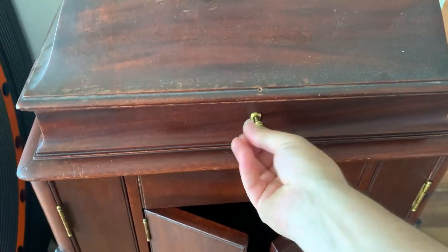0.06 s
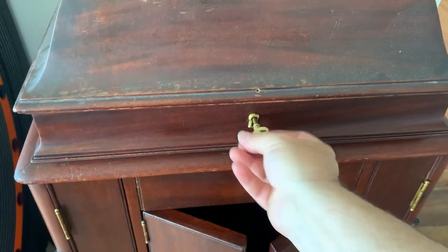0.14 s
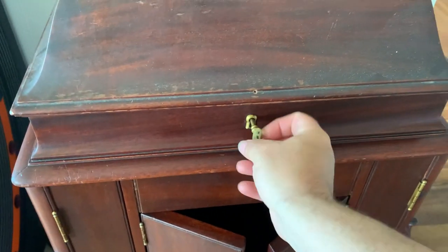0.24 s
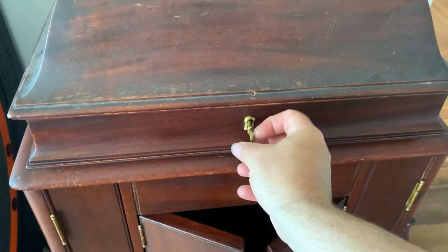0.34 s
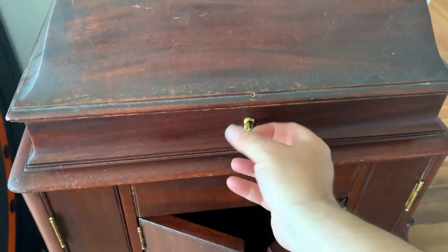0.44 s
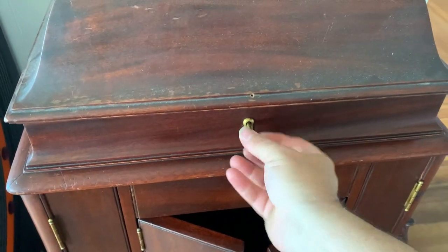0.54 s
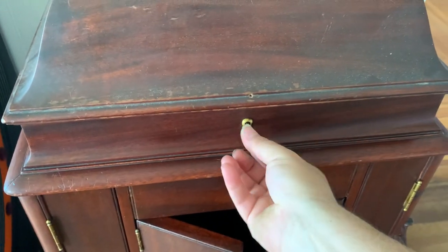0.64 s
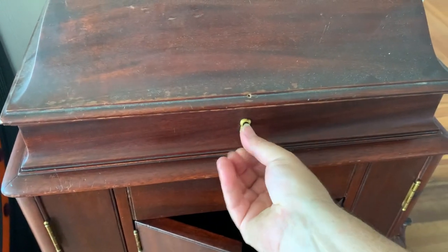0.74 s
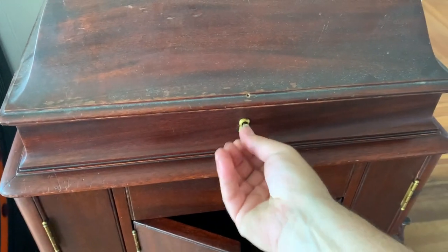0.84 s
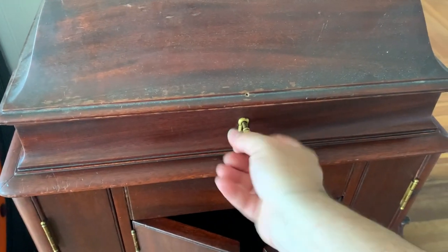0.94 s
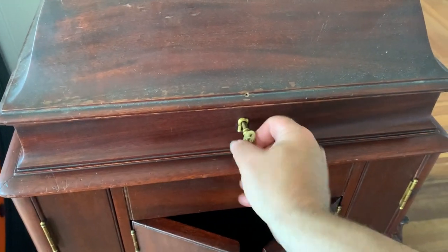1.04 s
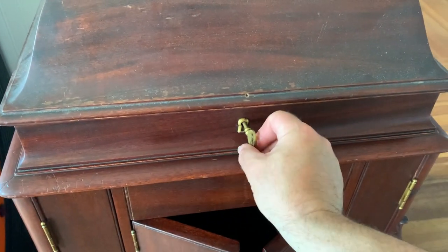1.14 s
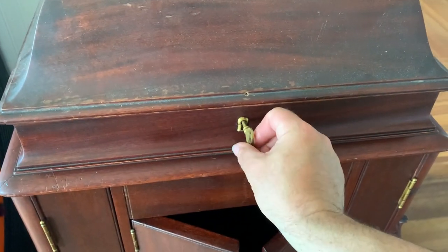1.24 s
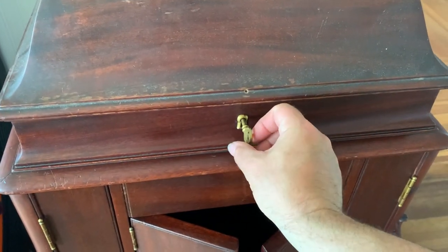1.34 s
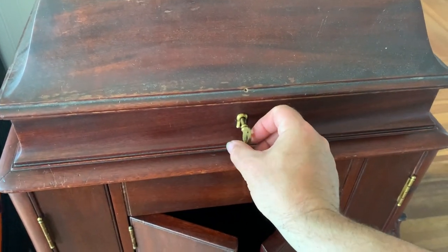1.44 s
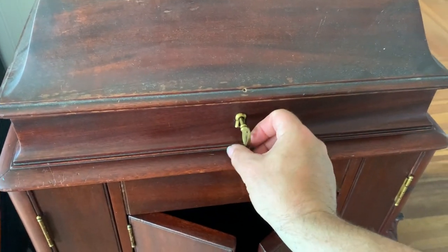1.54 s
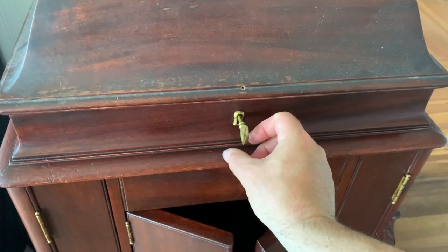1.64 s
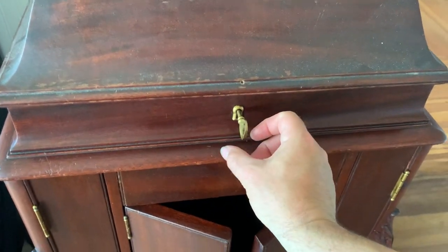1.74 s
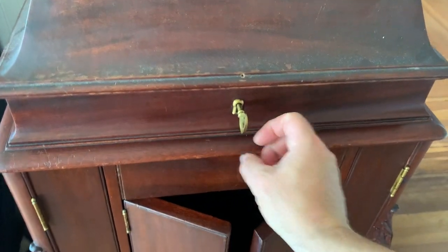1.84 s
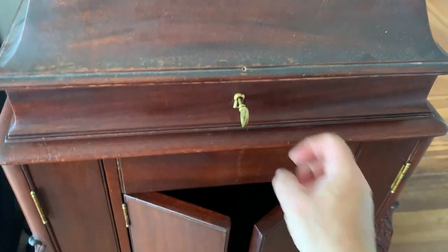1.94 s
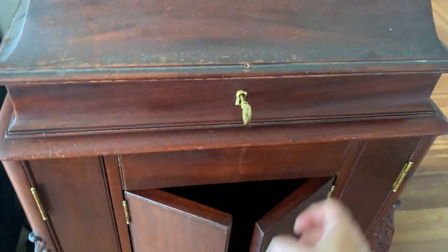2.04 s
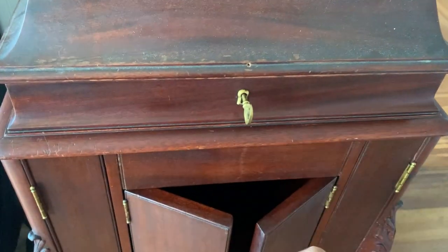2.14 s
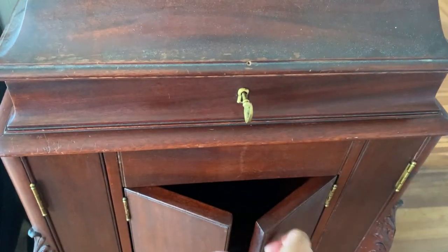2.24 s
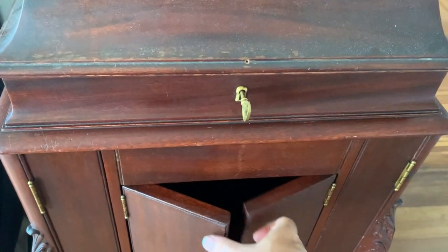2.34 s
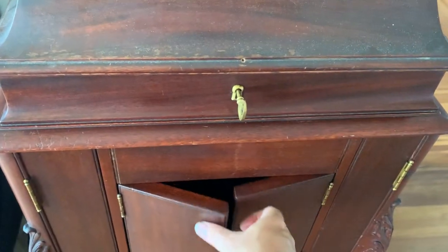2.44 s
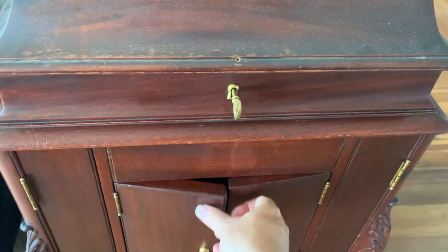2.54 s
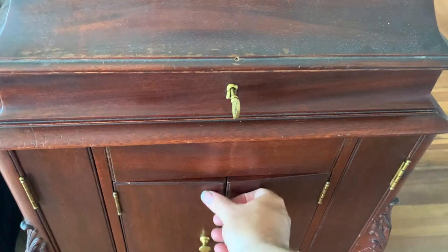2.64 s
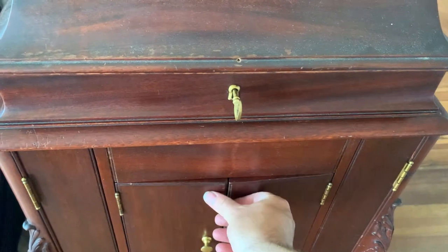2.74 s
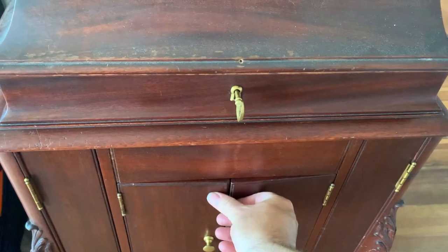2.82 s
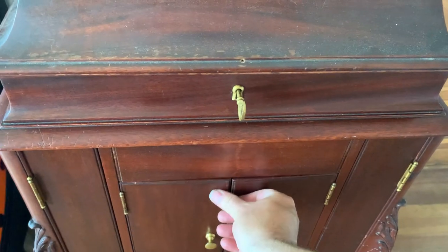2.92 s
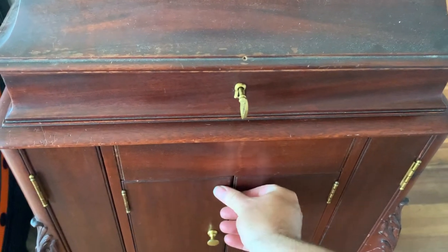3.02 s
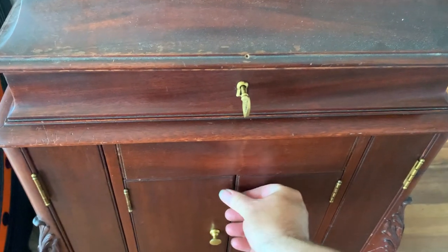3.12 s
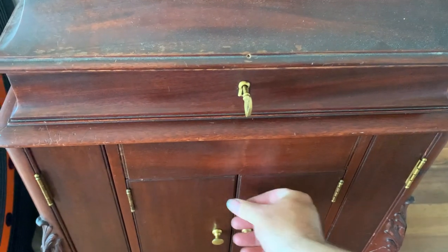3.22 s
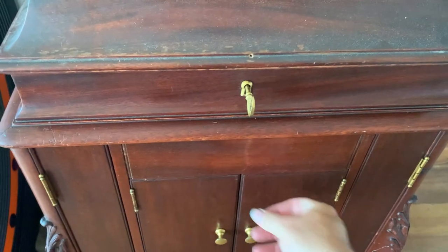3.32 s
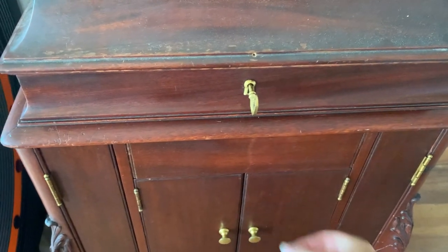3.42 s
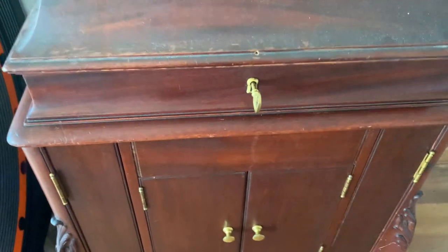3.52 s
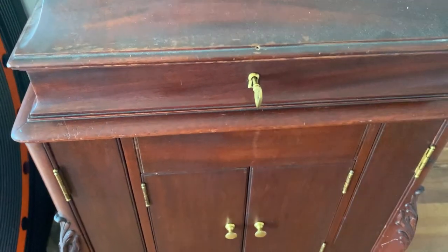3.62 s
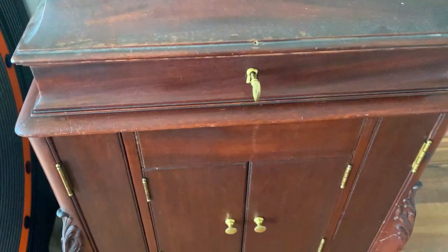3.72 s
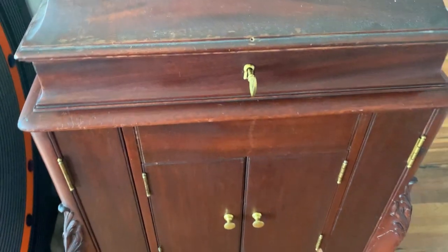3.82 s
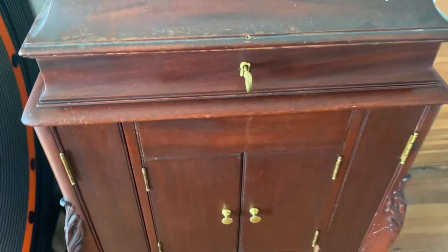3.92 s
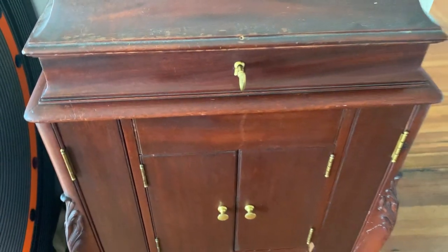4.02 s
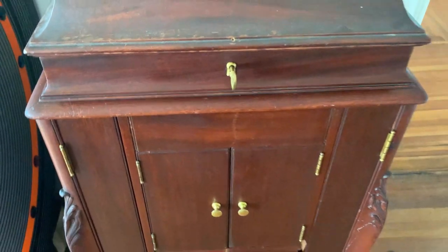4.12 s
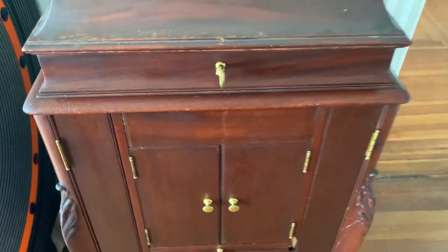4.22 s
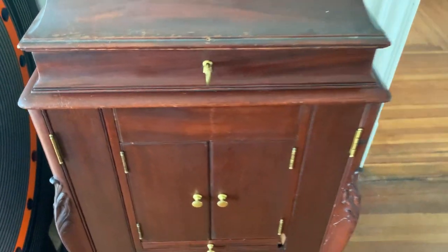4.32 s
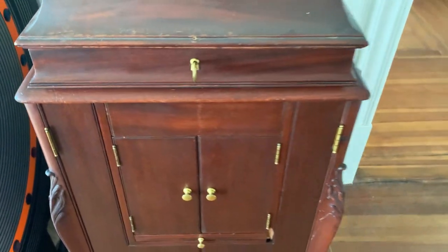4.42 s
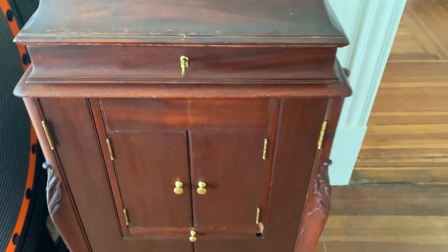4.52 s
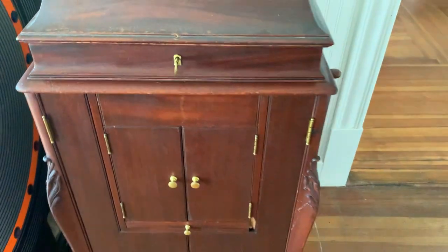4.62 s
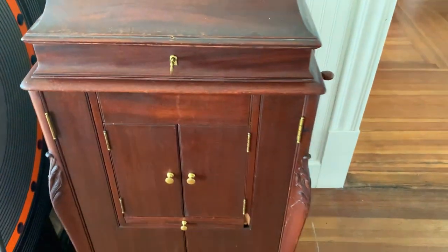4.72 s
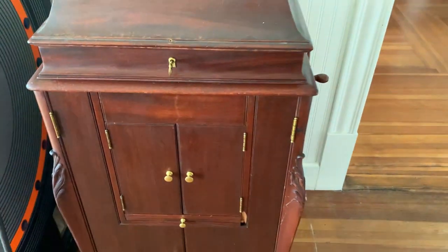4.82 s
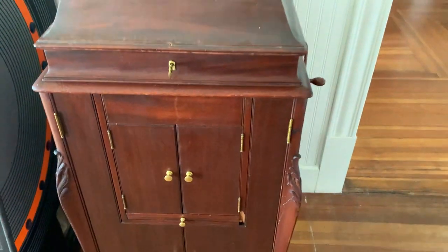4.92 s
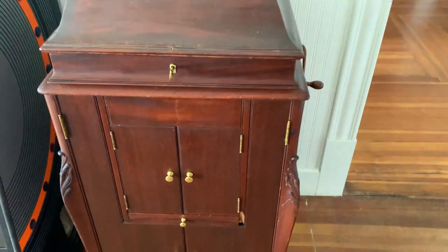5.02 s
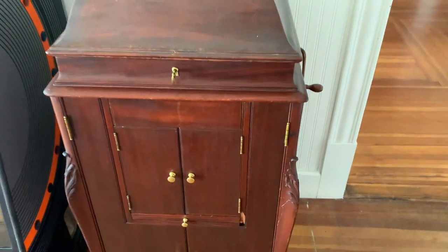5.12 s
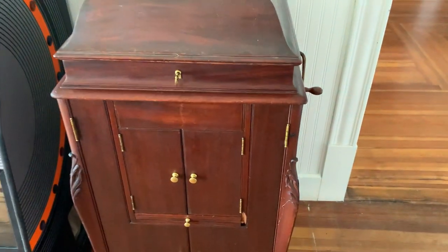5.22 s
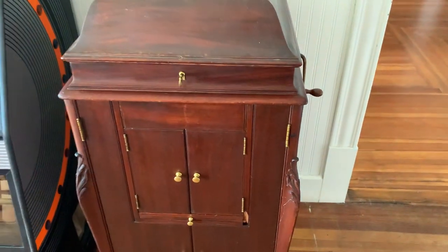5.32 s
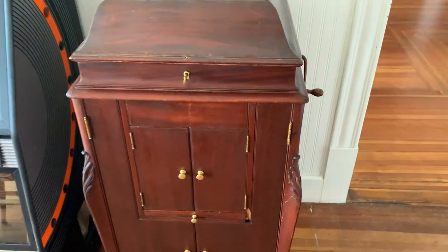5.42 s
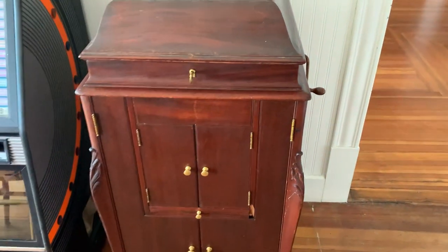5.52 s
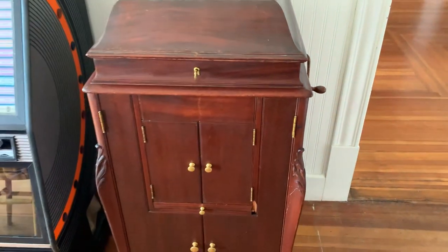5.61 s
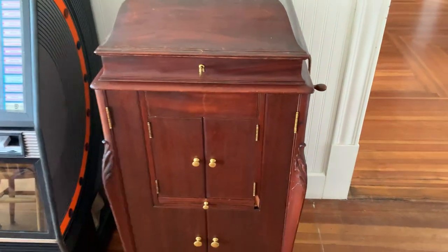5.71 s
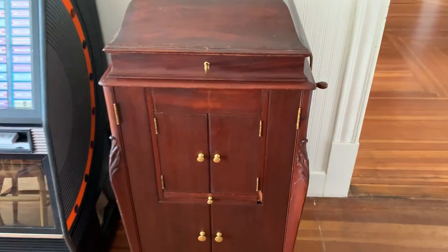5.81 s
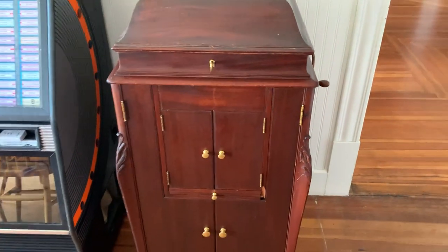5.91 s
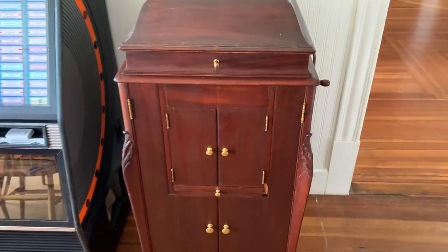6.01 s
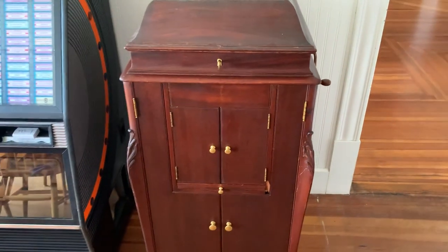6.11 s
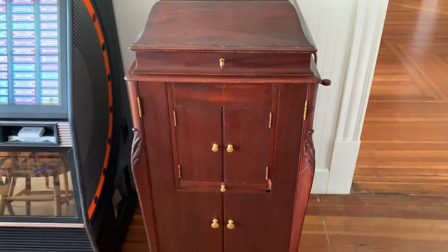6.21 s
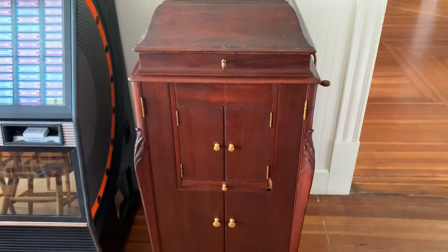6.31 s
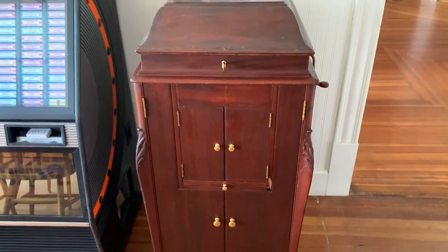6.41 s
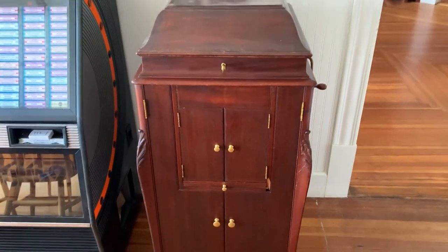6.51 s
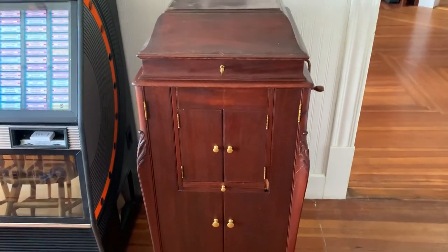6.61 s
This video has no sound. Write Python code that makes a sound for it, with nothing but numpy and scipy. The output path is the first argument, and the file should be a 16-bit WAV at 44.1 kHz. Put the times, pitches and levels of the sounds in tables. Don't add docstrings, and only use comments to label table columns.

```python
import sys
import numpy as np
from scipy import signal
from scipy.fft import rfft, irfft, next_fast_len
from scipy.io import wavfile
from scipy.ndimage import uniform_filter1d

SR = 44100
rng = np.random.default_rng(int(sys.argv[2]) if len(sys.argv) > 2 else 0)


def boost_factor(decibels):
    exponent = np.asarray(decibels, float) / 20
    return 10 ** exponent


def bounce(signal):
    frames = np.transpose(np.atleast_2d(signal))
    limited = np.clip(frames, -1, 1)
    pcm = np.round(limited * 32767).astype(np.int16)
    wavfile.write(sys.argv[1], SR, pcm)


N = 293696
T = np.arange(SR // 3) / SR

# start_s, knock_db, wood_db re knock, tick_db re knock, knock_pitch_hz
SLAM = [(3.025, -12, -4.5, -2.5, 1000), (3.024, -17, 9, -11, 1020), (3.03, -16, -7.5, -15, 4040),
        (3.0348, -16, 4, -12.5, 1100), (3.041, -11.5, -1.5, -1.5, 2616), (3.0526, -21, 7.5, -1.5, 1092)]


def along(table, hz):
    table_hz, values = np.transpose(table)
    return np.interp(np.log(np.maximum(hz, 1)), np.log(table_hz), values)


def colour(x, table, turn=1):
    size = next_fast_len(N + SR // 4)
    gain = boost_factor(along(table, np.fft.rfftfreq(size, 1 / SR)))
    return irfft(rfft(x, size) * turn * gain, size)[:N]


def band(x, lo_hz, hi_hz):
    sos = signal.butter(2, [lo_hz, min(hi_hz, SR * 0.45)], "band", fs=SR, output="sos")
    return signal.sosfilt(sos, x)


def walk(rate_hz):
    k = int(SR / rate_hz)
    levels = np.repeat(rng.standard_normal(N // 500), k)[:N]
    return 1.3 * uniform_filter1d(uniform_filter1d(levels, k), k)


def peak(x, db):
    return x * boost_factor(db) / np.sqrt(np.max(uniform_filter1d(x ** 2, size=128)))


def add(track, start_s, sound):
    i = int(start_s * SR)
    track[i:i + len(sound)] += sound[:N - i]


def ring(modes, push_s, scatter_db):
    hz, db, t60_s = np.transpose(modes)[:, :, None]
    luck, polarity = rng.standard_normal((2, len(modes), 1))
    weight = boost_factor(db + scatter_db * luck) * np.sign(polarity)
    y = np.sum(weight * np.sin(2 * np.pi * hz * T) * boost_factor(-60 * T / t60_s), axis=0)
    return y * (1 - np.exp(-T / push_s))


def burst(t60_s, lo_hz, hi_hz, rise_s=0.0004):
    envelope = boost_factor(-60 * T / t60_s) * np.minimum(T / rise_s, 1)
    return band(rng.standard_normal(len(T)) * envelope, lo_hz, hi_hz)


def spread(x, lo_hz, hi_hz):
    click = band(T < 0.5 / SR, lo_hz, hi_hz)
    return click * np.sqrt(np.sum(x ** 2) / np.sum(click ** 2))


def contacts(table, wood_hz, wood_t60, box_db, hold, push_s, thud_db, knock_t60, crack_db,
             tick_s, rise_s, panel_db, tick_hz):
    # pitch_hz, level_db, t60_s
    cabinet_modes = [(151, -6, .2), (244, -7.5, 0.23), (341.8, 0, 0.16), (453.3, -9.5, 0.39),
                     (521, -4.5, 0.19), (575, -2, 0.5), (642.4, -12, 0.077), (740, -10.5, 0.19),
                     (1013, -6.5, .12), (1150, -22.5, 0.23)]
    # pitch_hz, level_db, t60_s
    panel_modes = [(930, -10, 0.14), (1205, -12.5, .02), (1750, -10.5, 0.0086), (2500, 2.5, 0.022)]
    near, far = np.zeros((2, N))
    body = [(hz, db + box_db, hold * min(t60, 0.4)) for hz, db, t60 in cabinet_modes]
    panel = [(hz, db + panel_db, t60) for hz, db, t60 in panel_modes]
    wood_modes = [(wood_hz, 0, wood_t60), (1.1 * wood_hz, -7, 0.54 * wood_t60)] + body
    for start_s, db, wood_db, tick_db, knock_hz in table:
        wood = peak(ring(wood_modes, push_s, 0.5), 0)
        thud = burst(1.7 * wood_t60, 0.6 * wood_hz, min(2.1 * wood_hz, 700), 2 * push_s)
        wood = peak(wood + peak(thud, thud_db), db + wood_db)

        knock = peak(ring([(knock_hz, 0, knock_t60)] + panel, 0.6 * rise_s, 2.3), 0)
        crack = burst(knock_t60, 0.55 * knock_hz, 1.5 * knock_hz, rise_s)
        knock = peak(knock + peak(crack, crack_db), db)

        tick = peak(burst(tick_s, tick_hz, tick_hz + 12000, 0.47 * rise_s), db + tick_db)
        add(near, start_s, wood + knock + tick)

        sent = 0.55 * wood + 0.58 * spread(wood, 0.83 * wood_hz, min(1.9 * wood_hz, 750))
        sent = sent + 0.13 * knock + spread(knock, 0.4 * min(knock_hz, 1300), 1.6 * max(knock_hz, 1000))
        add(far, start_s, sent + spread(tick, tick_hz, 15000))
    return np.array([near, far])


def door_slam():
    return contacts(SLAM, wood_hz=530.1, wood_t60=0.03, box_db=6.8, hold=0.29, push_s=0.002, thud_db=-9.0,
                    knock_t60=0.023, crack_db=-3.9, tick_s=0.015, rise_s=0.00047, panel_db=-6.5, tick_hz=4300)


def box_air():
    # pitch_hz, level_db, t60_s, sign
    air_modes = [
        (108.5, -10.5, 0.38, 1),
        (116, -11, 0.38, -1),
        (67, -12.5, 0.26, 1),
    ]
    out = np.zeros(N)
    for hz, db, t60_s, sign in air_modes:
        swell = 1 - np.exp(-T / 0.01)
        add(out, SLAM[0][0], sign * np.sin(2 * np.pi * hz * T) * boost_factor(db - 60 * T / t60_s) * swell)
    return out


def doors_shut():
    # start_s, knock_db, wood_db re knock, tick_db re knock, knock_pitch_hz
    closings = [(2.3283, -57, 15.5, -40.5, 2270), (2.6975, -32, 1.5, -16, 985),
                (2.707, -36.5, 9, -9.5, 980), (2.7463, -46, 6, -18.5, 1020), (2.7701, -54.5, 7, -24, 956),
                (2.9389, -36.5, 5.5, -18.5, 2250), (2.9794, -47.5, 8, -16.5, 941),
                (3.7047, -42.5, 7, -30.5, 1050), (3.7486, -52.5, -5.5, -19, 1673)]
    return contacts(closings, wood_hz=232, wood_t60=0.055, box_db=-14.0, hold=0.13, push_s=0.008, thud_db=-6.0,
                    knock_t60=0.034, crack_db=-8, tick_s=0.042, rise_s=0.0015, panel_db=-6, tick_hz=3600)


def key_clicks():
    # start_s, knock_db, wood_db re knock, tick_db re knock, knock_pitch_hz
    clicks = [(0.037, -44, -0.5, -22, 1395), (0.0554, -54.5, 9, -13, 1250), (0.345, -48, -1.5, -27, 1600),
              (0.4207, -49, -27, -4, 2640), (0.5925, -51, 3, -16, 2545), (0.6206, -62, 10.5, -42, 1710),
              (0.7444, -68, 13.5, -3, 2330), (0.9787, -42.5, -1, -9, 1600), (0.9994, -47.5, -3, -32, 1366),
              (1.0247, -40, -19, 2.5, 1640), (1.1188, -44.5, -2.5, -4.5, 1880),
              (1.4228, -37.5, -4.5, -16, 1450), (1.4235, -58, 10, -19, 4110),
              (2.4659, -57.5, -3, -19.5, 2090), (3.4416, -55, -8.5, -3.5, 2140),
              (4.331, -59.5, -6.5, -3, 1874)]
    return contacts(clicks, wood_hz=545, wood_t60=0.035, box_db=-5, hold=0.25, push_s=0.0022, thud_db=-1.5,
                    knock_t60=0.058, crack_db=2, tick_s=0.0121, rise_s=0.00059, panel_db=-7.5, tick_hz=6400)


def knuckles():
    # start_s, knock_db, wood_db re knock, tick_db re knock, knock_pitch_hz
    raps = [
        (0.926, -39.5, -5.5, -45, 788),
        (0.968, -56.5, 7, -45, 610),
    ]
    return contacts(raps, wood_hz=545, wood_t60=0.058, box_db=-14, hold=0.15, push_s=0.002, thud_db=-10,
                    knock_t60=0.055, crack_db=-11, tick_s=0.01, rise_s=0.00067, panel_db=-18, tick_hz=7000)


def rattle():
    # start_s, length_s, start_db, end_db
    scrapes = [
        (.985, .085, -49.5, -57),
        (1.135, .01, -60, -58),
        (3.008, .014, -50, -41),
    ]
    attack_s, release_s, fade_db = 0.025, 0.06, -35.5
    gain = 0
    for start_s, length_s, start_db, end_db in scrapes:
        times = np.cumsum([start_s - attack_s, attack_s, length_s, release_s])
        db = [start_db + fade_db, start_db, end_db, end_db + fade_db]
        gain = gain + boost_factor(np.interp(np.arange(N) / SR, times, db, -150, -150))
    struck = rng.random(N) < 2500 / SR
    grains = struck * boost_factor(2.4 * rng.exponential(size=N)) * rng.standard_normal(N)
    y = band(grains, 900, 1300) + boost_factor(-5) * band(grains, 2900, 4600) + boost_factor(-27.0) * band(grains, 6000, 14000)
    return y / np.std(y) * gain


def steps():
    # start_s, level_db, pitch_hz, scuff_db re thud
    footfalls = [(2.707, -35, 60.97, 7.5), (2.759, -34.5, 105, -2.5), (2.949, -36.5, 116, 8),
                 (3.48, -39.5, 66.2, -4.5), (4.101, -42, 54.2, -24), (4.179, -46, 119.2, 0.5),
                 (4.209, -45.5, 51.7, -0.5), (4.279, -45.5, 54.16, -21), (4.334, -39, 72.3, -23),
                 (4.508, -45.5, 244, -8), (4.884, -47.5, 67, -10.5), (5.078, -45, 55.4, -12),
                 (5.099, -44.5, 53.27, -16)]
    out = np.zeros(N)
    for start_s, db, hz, scuff_db in footfalls:
        thud = peak(ring([(hz, 0, 0.12), (1.7 * hz, -9, 0.09)], 0.008, 1.8), db)
        scuff = peak(burst(0.12, 150, 390, 0.0042), db + scuff_db)
        add(out, start_s, thud + scuff)
    return out


def floorboards():
    # start_s, knock_db, wood_db re knock, tick_db re knock, knock_pitch_hz
    creaks = [(3.483, -51.5, -7, -28, 810), (4.5005, -42, -3, -1.5, 2380), (4.502, -32.5, -4, 3.5, 1826),
              (4.512, -40, -5, -23, 1530), (6.5291, -60, 11.5, -34.5, 1804),
              (6.6514, -59.5, 16.5, -19, 884)]
    return contacts(creaks, wood_hz=602, wood_t60=0.039, box_db=0, hold=0.54, push_s=0.0028, thud_db=0,
                    knock_t60=0.072, crack_db=0.32, tick_s=0.005, rise_s=0.00017, panel_db=0, tick_hz=7100)


def distant_boards():
    # start_s, knock_db, wood_db re knock, tick_db re knock, knock_pitch_hz
    settlings = [
        (5.5847, -49.5, 5, -3, 1583),
        (6.2257, -54.5, -10, -11.5, 1710),
    ]
    return contacts(settlings, wood_hz=588, wood_t60=0.06, box_db=0, hold=0.05, push_s=0.01, thud_db=0,
                    knock_t60=0.1, crack_db=4.6, tick_s=0.056, rise_s=0.0039, panel_db=0, tick_hz=8700)


def room(x):
    # pitch_hz, t60_s
    room_t60 = [(60, 1), (250, 0.46), (1000, .55), (3000, 0.59), (8000, 0.44), (15000, 0.3)]
    # pitch_hz, level_db
    room_colour = [(60, -5.5), (250, 9.5), (1000, -1.5), (3000, 3), (8000, 7), (15000, -0.5)]
    t = np.arange(SR) / SR
    tails = 0
    for hz in 45 * 2.0 ** np.arange(9):
        fade = boost_factor(along(room_colour, hz) - 60 * t / along(room_t60, hz))
        tails = tails + band(rng.standard_normal((2, SR)), hz / np.sqrt(2), hz * np.sqrt(2)) * fade
    tails = tails * (1 - np.exp(-t / 0.002)) / np.sqrt(SR / 20)
    return signal.fftconvolve(x[None], tails, axes=1)[:, :N]


def house():
    # pitch_hz, level_db per Hz
    spectrum = [(15, -32.5), (25, -4.5), (53, 5), (180, -6.5), (211, -3.5), (366, -10), (392, -12.5),
                (565, -9.5), (894, -18), (1030, -18.5), (2090, -15), (6000, -43), (8000, -49.5),
                (12000, -46.5), (15500, -42.5), (16000, -64)]
    # start_s, level_db
    stir = [
        [(0.0, -73), (0.3, -73), (0.47, -72.5), (1.78, -75), (2.21, -71), (2.66, -73)],
        [(3.55, -74.5), (3.84, -73), (3.962, -76.5), (4.202, -75.5), (4.46, -74)],
        [(4.8, -75), (4.934, -77), (5.576, -78), (5.736, -78.5), (6.072, -77.5), (6.66, -80)],
    ]
    # start_s, length_s, rumble_db, drone_db
    traffic = [(0.06, .15, 1, 5.5), (.5, .25, -0.5, 3.5), (1.456, .15, 4, -5.5), (2.397, .3, 1, 4.5),
               (2.62, 0.14, 5.5, 3.5), (4.222, .12, 4, 6), (4.994, 0.2, -0.5, 5.5), (5.443, .2, -7.5, 8.5),
               (5.862, 0.39, 2.5, 11)]
    # pitch_hz, width_hz, level_db
    whines = [(2150, 130, -72.5), (1020, 120, -76.5), (647, 63, -73)]
    t = np.arange(N) / SR
    stir_s, stir_db = np.transpose(np.vstack(stir))
    rustle = np.interp(t, stir_s, stir_db - np.median(stir_db))
    murmur = 0.81 * rustle
    start_s, length_s, rumble_db, drone_db = np.transpose(traffic)
    swell = np.exp(-((t[:, None] - start_s) / length_s) ** 2)
    rumble, drone = swell @ rumble_db - 2.5, swell @ drone_db - 3

    size = next_fast_len(N)
    f = np.fft.rfftfreq(size, 1 / SR)
    noise = rfft(rng.standard_normal((2, size))) * boost_factor(along(spectrum, f))
    # lo_hz, hi_hz, level_db, flicker_db
    bands = [(1, 82, rumble, 1.0), (82, 140, drone, 1.5), (140, 400, murmur, 1.5), (400, 900, murmur, 1.2),
             (900, 1600, 0.4 * rustle, 0.8), (1600, 2800, 0.4 * rustle, 0.8), (2800, 3700, 0.7 * rustle, 0.8),
             (3700, 5500, 1.4 * rustle, 1.0), (5500, 7000, 0.5 * rustle, 0.6), (7000, SR, 0.2 * rustle, 0.5)]
    out = 0
    for lo_hz, hi_hz, db, flicker_db in bands:
        part = irfft(noise * (f >= lo_hz) * (f < hi_hz), size)[:, :N]
        out = out + part * boost_factor(db + flicker_db * walk(11))
    out = out * boost_factor(-53) / np.sqrt(np.median(uniform_filter1d(out[0] ** 2, size=4096)))

    for hz, width_hz, db in whines:
        whine = band(rng.standard_normal((2, N)), hz - width_hz / 2, hz + width_hz / 2)
        out = out + whine / np.std(whine) * boost_factor(db + 2.0 * walk(6))
    return out


def whistle():
    # pitch_hz, level_db
    port_tone = (13800, -89)
    hz, db = port_tone
    return boost_factor(db) * np.sin(2 * np.pi * hz * np.arange(N) / SR)


def scene():
    # pitch_hz, level_db
    frontal = [(60, -7), (400, -16.5), (1300, -7), (4400, 0), (15000, 0.5)]
    # pitch_hz, level_db
    room_side = [(100, -3), (350, -6.5), (900, -0.5), (3000, -0.5)]
    slam, shut = door_slam(), doors_shut()
    key = key_clicks() + rattle() + knuckles()
    boards, distant = floorboards(), distant_boards()
    feet, air = steps(), box_air()

    near = slam[0] + shut[0] + key[0] + boards[0] + distant[0] + feet + air
    sent = boost_factor(-6.5) * slam[1] + boost_factor(-5.5) * shut[1] + boost_factor(-8.5) * key[1]
    sent = sent + boost_factor(-2.0) * boards[1] + boost_factor(1.5) * distant[1] + boost_factor(-13.5) * feet + boost_factor(-21) * air
    wet = room(sent)
    direct = np.array([near, colour(near, frontal) + whistle()])
    echoes = np.array([wet[0], colour(wet[1], room_side)])
    return direct + echoes + house()


def band_limit(x):
    return signal.sosfilt(signal.butter(12, 16830, fs=SR, output="sos"), x)


def record(dry):
    # pitch_hz, level_db
    sum_response = [(15, -14.5), (45, -4), (5400, -5), (6500, -2), (8000, -5), (8600, -16), (9300, -2),
                    (11500, 1), (12900, -10.5), (13500, -25.5), (14300, -2.5), (15600, -13.5),
                    (16300, -21.5), (16700, -58.5)]
    # pitch_hz, level_db
    difference_response = [(30, -14.5), (100, -15), (300, -12), (700, -5), (1500, -4), (4400, -5.5),
                           (6600, -6.5), (8500, 4.5), (10200, -2.5), (11000, -24), (11800, -3.5),
                           (13700, -2), (15000, -4.5), (16200, -23)]
    mid = colour(dry[0], sum_response)
    side = colour(dry[1], difference_response, 1j)
    stereo = np.array([mid + side, mid - side])
    return band_limit(np.tanh(1.016 * stereo) / 0.81)


dry = scene()
out = record(dry)
bounce(out)
```